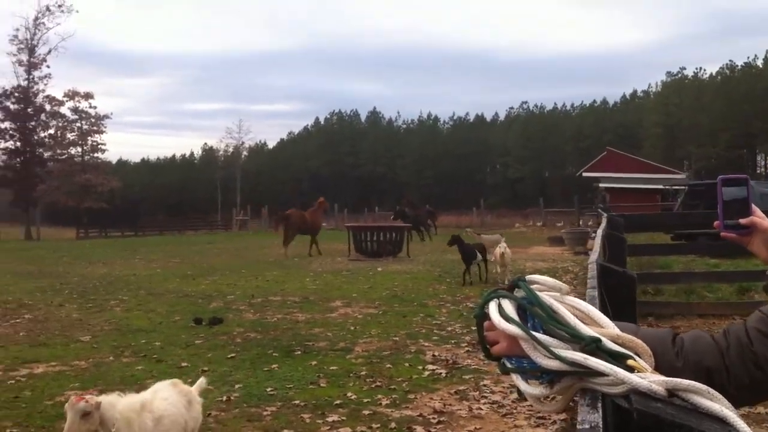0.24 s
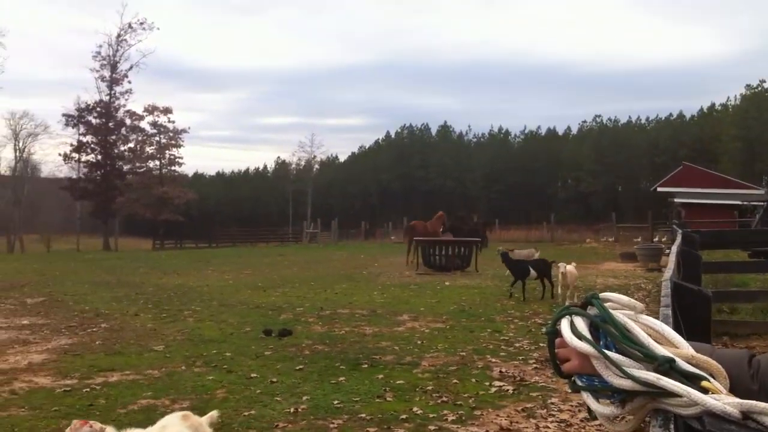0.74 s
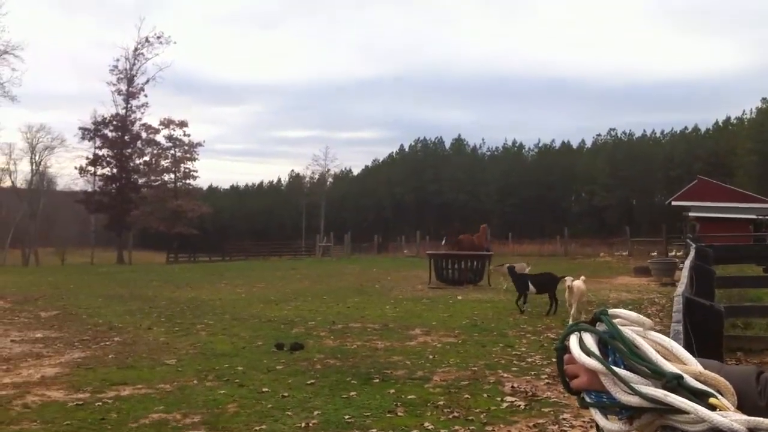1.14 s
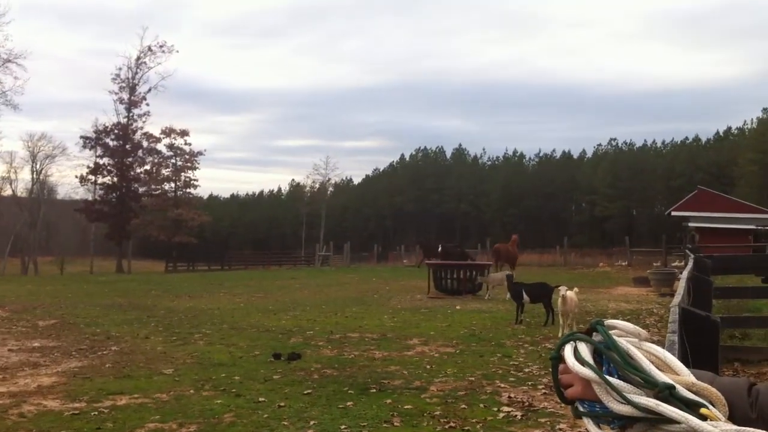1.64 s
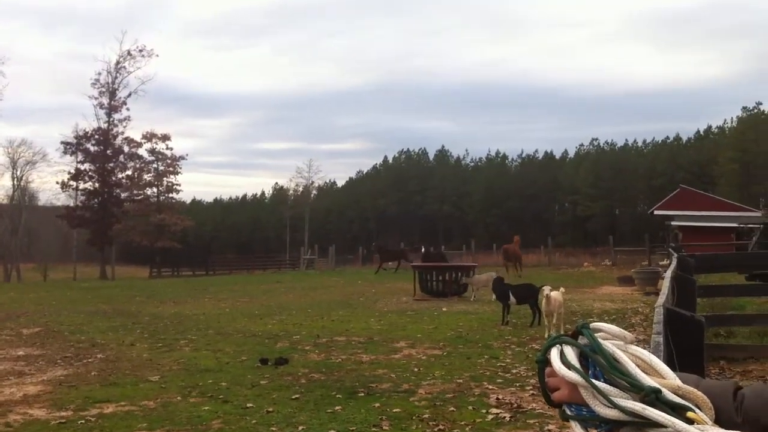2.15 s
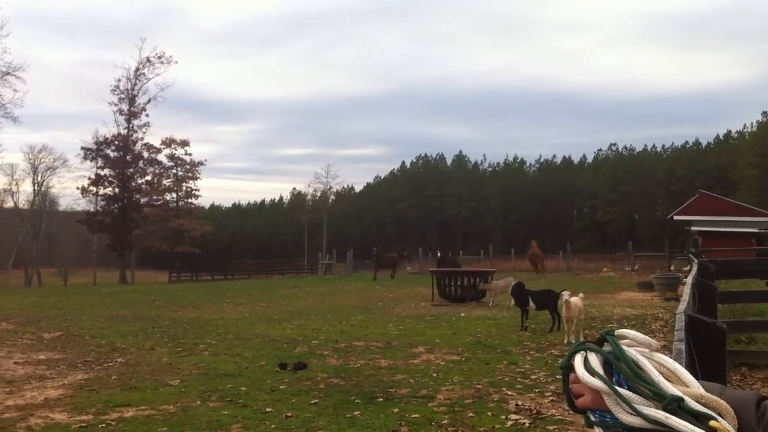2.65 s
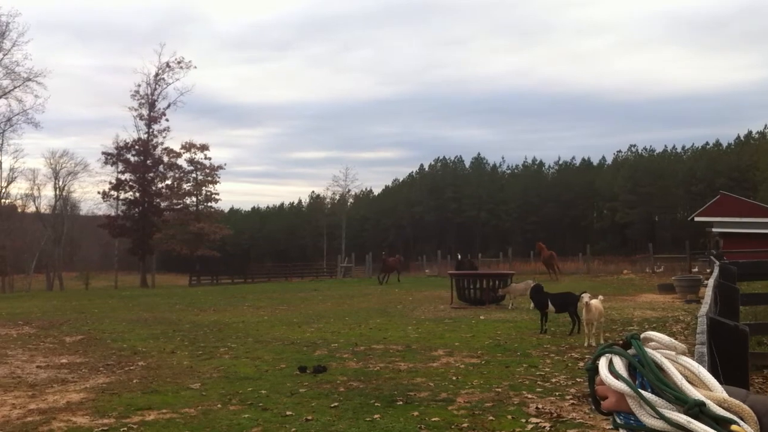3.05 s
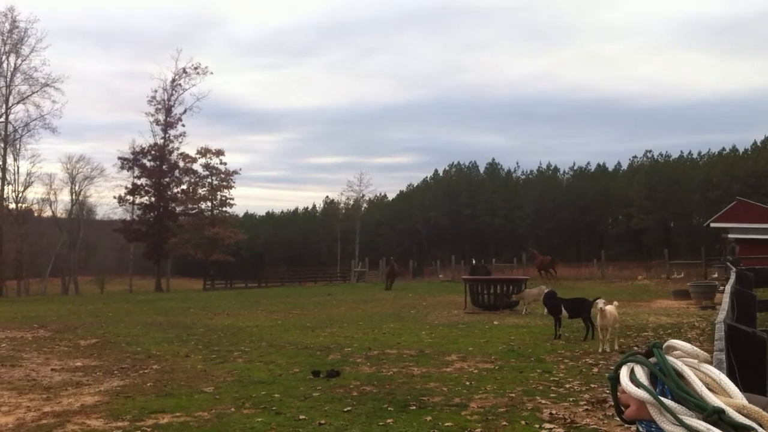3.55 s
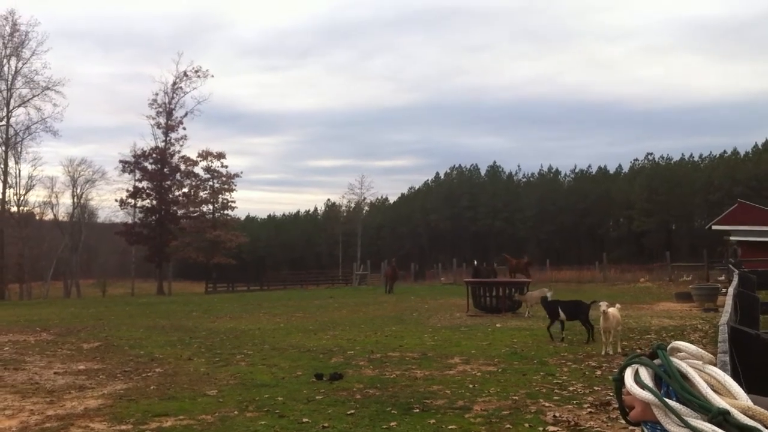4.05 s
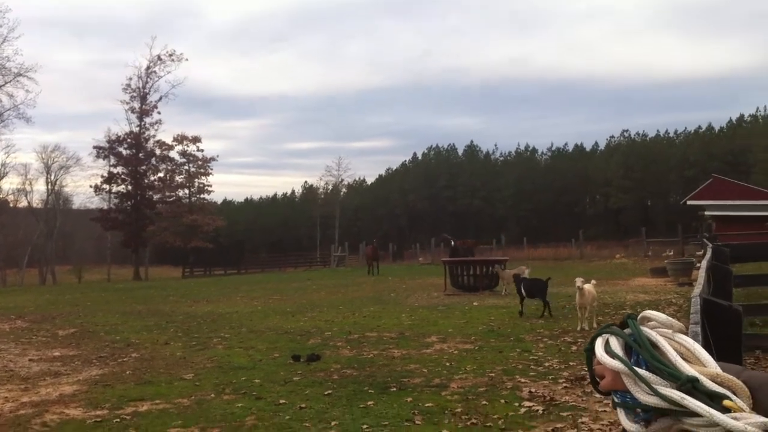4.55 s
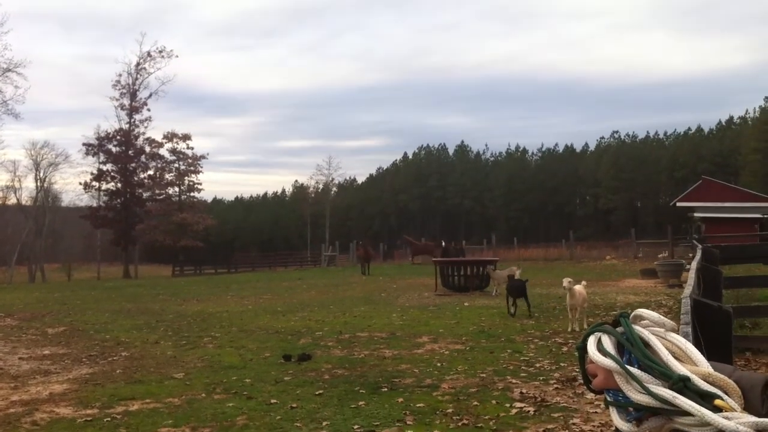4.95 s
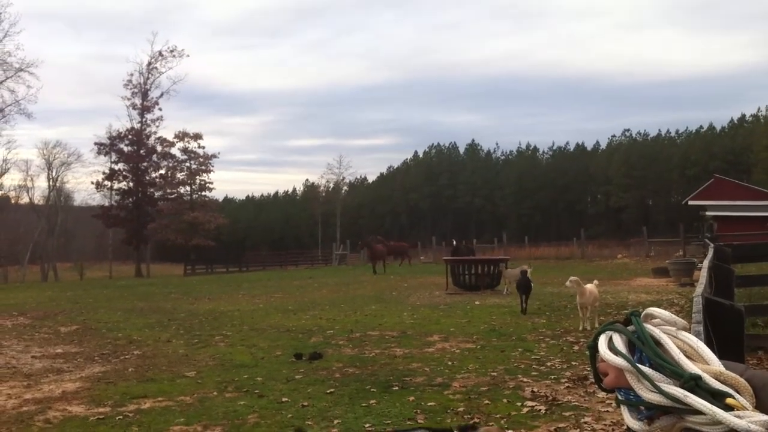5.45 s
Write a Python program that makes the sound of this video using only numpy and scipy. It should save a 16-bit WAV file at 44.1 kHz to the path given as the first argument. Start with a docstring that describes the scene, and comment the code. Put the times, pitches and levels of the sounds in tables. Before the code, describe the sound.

Handheld phone-like microphone in a still field by trees. Low, soft hoof thuds come unevenly, mixed with bright small snaps and short leaf shuffles. A sudden wooden knock stands out, echoing faintly off the woods. Soon stiff fabric scrapes and crackles very close, in two bursts. It quiets down to sparse leaf sounds before a low, breathy, fluttering horse snort and one last deep thud.

```python
"""A quiet autumn pasture: still air, far hooves and faint leaf stir (coloured noise and random grains).
From the start, stalks snap (resonant ticks), near hooves thud (sagging tones) and feet shuffle in leaves.
From 2.5 s one hard and two far softer blows ring a board (decaying modes), with a tree echo (noise wash);
from 3.2 s a coat sleeve rustles twice at the microphone (dense grains).
From 4.9 s a horse snorts: fluttering nostrils release puffs (pulses in nose resonances) and air hiss."""
import sys
import numpy as np
from scipy import signal
from scipy.fft import rfft, irfft, next_fast_len
from scipy.io import wavfile
from scipy.ndimage import uniform_filter1d

SR = 44100
rng = np.random.default_rng(int(sys.argv[2]) if len(sys.argv) > 2 else 0)


def transcribe(signal):
    """Save signal, clipped to [-1, 1], as a 16-bit WAV file at the path in sys.argv[1]."""
    frames = np.atleast_2d(signal).T
    limited = np.clip(frames, -1, 1)
    pcm = np.round(limited * 32767).astype(np.int16)
    wavfile.write(sys.argv[1], SR, pcm)


N = 251370
T = np.arange(N) / SR

# spectrum of thin dry edges: [f/Hz, density/(dB per Hz)]
CRISP_SPECTRUM = [(1500, -9), (2800, 3.5), (4000, 2), (6500, 4), (9000, 2), (12000, 1), (16000, -1.5)]
# spectrum of crushed lower leaf layers: [f/Hz, density/(dB per Hz)]
CRUNCH_SPECTRUM = [(250, -21), (600, 6.5), (1000, -1), (1700, 7), (2800, 1.5), (4000, 5.5), (7000, -53.5)]


def undb(db):
    """Decibels to gain."""
    return 10 ** (np.asarray(db) / 20)


def unit(x):
    """Scale to rms 1."""
    return x / np.sqrt(np.mean(x ** 2) + 1e-30)


def decay(t, t60_s):
    """Exponential fade, -60 dB at t60_s."""
    return np.exp(-np.log(1000) * t / t60_s)


def read(points, hz):
    """Interpolate (f/Hz, value) points on a log-frequency axis."""
    f, value = np.transpose(points)
    return np.interp(np.log(hz), np.log(f), value)


def curves(rows):
    """Interpolate each column of a time table at every sample."""
    s, *columns = np.transpose(rows)
    return [np.interp(T, s, c) for c in columns]


def add(out, s, x):
    """Mix x into out from time s."""
    i = max(int(s * SR), 0)
    out[i:i + len(x)] += x[:max(N - i, 0)]


def band(x, hz, width_hz):
    """One resonance, gain 1 at its centre."""
    hz = min(hz, 0.45 * SR)
    b, a = signal.iirpeak(hz, hz / min(width_hz, 0.3 * SR), fs=SR)
    return signal.lfilter(b, a, x)


def colour(x, points):
    """Minimum-phase filter with the given spectrum, falling 10 dB/octave from its end values."""
    size = next_fast_len(2 * len(x), True) // 2 * 2
    hz = np.maximum(np.arange(size // 2 + 1) * SR / size, 1)
    below, above = np.maximum(points[0][0] / hz, 1), np.maximum(hz / points[-1][0], 1)
    octaves_outside = np.log2(below * above)
    cepstrum = irfft(np.log(undb(read(points, hz) - 10 * octaves_outside)))
    # fold the cepstrum to make it causal
    cepstrum[1:size // 2] *= 2
    cepstrum[size // 2 + 1:] = 0
    return irfft(rfft(x, size) * np.exp(rfft(cepstrum)), size)[:len(x)]


def crumpled(points, spread_db, count=30):
    """A spectrum with chance peaks and hollows: no two leaves ring alike."""
    hz = np.geomspace(points[0][0], points[-1][0], count)
    return np.transpose([hz, read(points, hz) + spread_db * rng.standard_normal(count)])


def crackle(rate_hz, spread_db, grain_s):
    """Random tiny noise bursts of uneven size; amplitude falls by 1/e in grain_s."""
    chance, size, noise = rng.random(N), rng.exponential(size=N), rng.standard_normal(N)
    energy = (chance < rate_hz / SR) * undb(spread_db * np.minimum(size, 4)) ** 2
    energy = signal.lfilter([1], [1, -np.exp(-2 / (grain_s * SR))], energy + 1e-12)
    return noise * np.sqrt(energy)


def burst(x, window_s):
    """Scale a hit so that its loudest window has rms 1."""
    power = uniform_filter1d(x ** 2, max(int(window_s * SR), 1))
    return x / np.sqrt(power.max())


def pasture(air_db=-65, crunch_db=-9, ticks_db=-4):
    """Still open air, drumming of far hooves and a faint stir of leaves with small stalks ticking."""
    # herd activity: [t/s, distant drumming/dB, leaf stir/dB before its crunch and ticks]
    herd = [(0, -60, -63), (.65, -67.5, -56), (1.35, -64.5, -62.5), (2.1, -71, -71), (2.8, -67, -65),
            (3.55, -66.5, -61.5), (4.7, -68, -67.5), (5.15, -62, -62), (5.5, -67, -77)]
    # spectrum of far hooves: [f/Hz, density/(dB per Hz)]
    far_hooves = [(50, -32), (110, -1.5), (180, 3.5), (270, -5.5), (420, -18.5), (900, -8.5)]
    # spectrum of open air: [f/Hz, density/(dB per Hz)]
    field = [(15, -43), (25, -13.5), (270, -0.5), (887, -14), (1040, -15), (1890, -11.5), (2220, -10),
             (2760, -20), (2990, -13), (3340, -16), (5280, -18.5), (10400, -22.5), (16000, -15.5)]
    drum_db, stir_db = curves(herd)
    footfalls = crackle(rate_hz=70, spread_db=1.5, grain_s=0.012)
    drumming = unit(colour(footfalls, far_hooves))
    brushes = crackle(rate_hz=110, spread_db=5.5, grain_s=0.014)
    ticks = crackle(rate_hz=24, spread_db=1.5, grain_s=0.0016)
    stir = unit(colour(brushes, CRISP_SPECTRUM))
    stir += undb(crunch_db) * unit(colour(brushes, CRUNCH_SPECTRUM))
    stir += undb(ticks_db) * unit(colour(ticks, CRISP_SPECTRUM))
    air = unit(colour(rng.standard_normal(N), field))
    return undb(air_db) * air + undb(drum_db) * drumming + undb(stir_db) * stir


def snaps(t60_s=0.011, tail_db=-23, tail_t60_s=0.094, breadth=1.14, variety_db=3.0):
    """A dry stalk or a stiff fold gives way with a bright tick: a noise burst through one wide resonance."""
    # snapping leaves and stalks: [t/s, level/dB, centre f/Hz]
    breaks = [(0.043, -51.5, 1620), (.089, -40, 6640), (0.464, -42, 8000), (0.508, -40.5, 6000),
              (0.541, -49, 6000), (0.593, -44.5, 7050), (.708, -51, 6450), (0.882, -51.5, 2960),
              (1.169, -46, 5000), (1.245, -49, 6000), (1.321, -46.5, 5000), (1.344, -43.5, 7000),
              (1.443, -38, 4000), (1.719, -36, 5070), (2.317, -40, 8800), (2.354, -41, 5570),
              (2.966, -38, 6540), (3.111, -43.5, 8100), (3.159, -46, 2500), (3.233, -32, 2880),
              (3.337, -30, 5070), (3.405, -39, 5500), (3.443, -37, 7960), (3.626, -47, 1600),
              (3.689, -46, 8050), (3.749, -41, 7040), (3.908, -40.5, 5150), (3.990, -47, 5000),
              (4.033, -40, 4250), (4.111, -35.5, 5000), (4.397, -30, 5640), (4.610, -41, 7040)]
    out, t = np.zeros(N), T[:SR // 10]
    fade = decay(t, t60_s) + undb(tail_db) * decay(t, tail_t60_s)
    for s, db, hz in breaks:
        tick = colour(rng.standard_normal(len(t)) * fade, crumpled([(700, 0), (16000, 0)], variety_db))
        add(out, s, undb(db) * burst(band(tick, hz, breadth * hz), 0.0029))
    return out


def hooves(rise_s=0.0031, sag=0.14, earth_db=-12, earth_t60_s=0.12, slap_db=-7, slap_t60_s=0.012):
    """Each hoof slaps and presses the turf: low cycles sag in pitch, then loose earth settles."""
    # near hooves: [t/s, thud level/dB, mid-sag thud f/Hz]
    footfalls = [(0.135, -59.5, 240), (0.319, -53, 268), (0.405, -50, 290), (.425, -53, 230),
                 (.77, -51, 282), (0.868, -48, 246), (1.058, -55.5, 223), (1.247, -48, 226),
                 (1.346, -48.5, 241), (1.434, -53, 217), (1.706, -56, 240), (1.81, -47.5, 240),
                 (2.185, -59.5, 227), (2.289, -53.5, 222), (2.349, -57, 188), (2.9, -50, 145),
                 (3.151, -49.5, 216), (3.384, -53, 149), (3.632, -57, 280), (4.99, -52.5, 195),
                 (5.675, -44, 143)]
    # spectrum of loose earth: [f/Hz, density/(dB per Hz)]
    earth_spectrum = [(70, -24), (150, 1), (260, 14), (450, -2), (800, 3), (1600, -42), (3000, -27)]
    t60_cycles = 14.4  # deep thuds last longer
    out, t = np.zeros(N), T[:SR // 4]
    press = 1 - np.exp(-(t / rise_s) ** 2)
    for s, db, hz in footfalls:
        # from (1 + sag) down to (1 - sag) times hz
        thud_hz = hz * (1 + sag * (2 * np.exp(-t / 0.0087) - 1))
        phase = np.cumsum(thud_hz) / SR
        thud = np.sin(2 * np.pi * phase) * press * decay(t, t60_cycles / hz)
        slap = rng.standard_normal(len(t)) * decay(t, slap_t60_s)
        slap = band(band(slap, 2.1 * hz, 1.4 * hz), 2 * hz, 1.6 * hz)
        earth = colour(rng.standard_normal(len(t)), earth_spectrum) * press * decay(t, earth_t60_s)
        hit = burst(thud, 0.0066)
        hit += undb(slap_db) * burst(slap, 0.011) + undb(earth_db) * burst(earth, 0.0057)
        add(out, s, undb(db) * hit)
    return out


def leaves(skew=0.52, roundness=1.0, variety_db=3.0):
    """A foot pushes into dry leaves: thin edges crackle, crushed layers crunch lower down."""
    # steps: [t/s, length/s, edge level/dB, crunch re edges/dB]; levels ahead of the push envelope
    steps = [(0.148, 0.045, -62, -3), (0.284, 0.049, -49, -19), (0.497, 0.083, -55.5, -0.5),
             (0.882, 0.025, -50, 4), (0.977, 0.085, -56.5, -4), (1.013, 0.065, -47, -3),
             (1.164, 0.065, -49, -5), (1.242, .044, -51, 1), (1.286, 0.077, -54.5, -8),
             (1.407, 0.038, -54.5, -0.5), (1.497, 0.077, -51, -18), (1.718, 0.074, -50, -26),
             (1.76, 0.062, -46.5, -8), (2.039, 0.022, -50, -8.5), (2.108, 0.052, -51, -5),
             (2.191, .056, -57.5, -24), (2.349, 0.04, -58, 1.5), (2.452, 0.016, -53, -3.5),
             (2.597, 0.1, -50, -6), (2.759, 0.064, -49.5, -8), (2.823, 0.051, -59, -13),
             (3.032, 0.035, -53.5, -6), (3.157, 0.028, -45.5, -5), (3.422, 0.027, -43, -6.5),
             (3.459, 0.041, -43, -11), (3.622, 0.043, -60, 13.5), (3.736, 0.039, -58, -4),
             (4.584, 0.05, -56, -9), (4.681, 0.037, -52, -8.5), (4.872, 0.067, -52.5, -12),
             (5.192, 0.032, -43, -33), (5.293, 0.18, -61.5, -3), (5.591, 0.12, -52.5, -8)]
    out = np.zeros(N)
    edges = crackle(rate_hz=1000, spread_db=3.5, grain_s=0.002)
    layers = crackle(rate_hz=1100, spread_db=5, grain_s=0.001)
    for s, length_s, step_db, crunch_db in steps:
        size = int(length_s * SR)
        push = np.abs(np.sin(np.pi * np.linspace(0, 1, size) ** skew)) ** roundness
        parts = ((edges, CRISP_SPECTRUM, step_db), (layers, CRUNCH_SPECTRUM, step_db + crunch_db))
        for grains, spectrum, db in parts:
            handful = grains[rng.integers(N - SR):][:size]
            add(out, s, undb(db) * push * unit(colour(handful, crumpled(spectrum, variety_db))))
    return out


def board(crack_db=-1, travel_s=0.0071, dispersion=0.5, panel_hz=368, panel_rise_s=0.014,
          echo_db=-23, echo_t60_s=1.0, echo_rise_s=0.015):
    """A blow rings the board and sets a loose panel humming; the trees send back a soft wash."""
    # blows: [t/s, board level/dB, contact low-pass f/Hz, panel re board/dB, panel t60/s]
    knocks = [(2.4875, -29.5, 3000, -28, 0.28), (2.8636, -54.5, 614, 5.5, 0.12),
              (3.366, -61.5, 590, 10, 0.058)]
    # board modes: [f/Hz, relative level/dB, t60/s]
    modes = [(195, -7, 0.28), (232, -10, 0.26), (259, 3.5, 0.11), (314.4, -6.5, 0.27), (373, -2.5, 0.3),
             (440, -1.5, 0.11), (507, -7, 0.18), (694, -1.5, 0.1), (794, -11, 0.19), (860, -9, 0.18),
             (1003, -16, 0.37), (1126, -10.5, 0.29), (1236, 6, 0.043), (1287, 10, 0.028), (1500, -14, 0.25),
             (1677, -4, 0.056), (1910, -3, 0.07), (2150, -4, 0.048), (2540, -7, 0.047)]
    # spectrum of the first crack: [f/Hz, density/(dB per Hz)]
    crack_spectrum = [(80, -30), (160, 7), (270, 3), (450, 8.5), (750, 8), (1300, 0.5), (2200, -2),
                      (3500, -6), (6000, -2), (12000, -7)]
    # decay of the crack: [f/Hz, t60/s]
    crack_t60 = [(150, 0.33), (600, 0.14), (1500, 0.063), (3000, 0.055), (8000, 0.026)]
    # spectrum of the tree echo: [f/Hz, density/(dB per Hz)]
    trees = [(100, -36), (220, 7), (500, -2), (1000, 0.5), (2000, 1), (3000, -7), (5000, -36)]
    out, t = np.zeros(N), T[:SR]

    def swell(hz, t60_s):
        """Low bending waves travel slowly, so they build up last, then die away."""
        build_s = travel_s * (300 / hz) ** dispersion
        return (1 - np.exp(-(t / build_s) ** 2)) * decay(t, t60_s)

    for s, db, contact_hz, panel_db, panel_t60_s in knocks:
        ring = np.zeros(len(t))
        for hz, mode_db, t60_s in modes:
            ring += undb(mode_db) * np.sin(2 * np.pi * (hz * t + rng.random())) * swell(hz, t60_s)
        crack = np.zeros(len(t))
        for hz in np.geomspace(180, 12000, 13):
            noise = unit(band(band(rng.standard_normal(len(t)), hz, hz / 2), hz, hz / 2))
            # sqrt(hz): density to band level
            crack += undb(read(crack_spectrum, hz)) * np.sqrt(hz) * noise * swell(hz, read(crack_t60, hz))
        echo = unit(colour(rng.standard_normal(len(t)), trees))
        echo *= (1 - np.exp(-t / echo_rise_s)) * decay(t, echo_t60_s)
        blow = burst(ring, 0.0049) + undb(crack_db) * burst(crack, 0.025) + undb(echo_db) * echo
        # a softer contact leaves the high modes still
        contact = signal.butter(2, min(contact_hz, SR / 4), fs=SR, output="sos")
        blow = signal.sosfilt(contact, blow)
        panel = np.sin(2 * np.pi * panel_hz * t)
        panel *= (1 - np.exp(-(t / panel_rise_s) ** 2)) * decay(t, panel_t60_s)
        add(out, s, undb(db) * (burst(blow, 0.09) + undb(panel_db) * burst(panel, 0.03)))
    return out


def sleeve(catch_db=0.94, catch_s=0.011, variety_db=2, ticks_db=-7, fold_skew=0.57):
    """Threads catch and slip in dense grains, stiff creases tick; the folds rumble as they shift."""
    # strokes: [t/s, length/s, final hiss level/dB, swell over the stroke/dB, weave rasp re hiss/dB]
    strokes = [(3.226, 0.11, -39, -1.5, -2), (3.78, 0.093, -46.5, 2, -6), (3.901, 0.073, -56.5, 7, 0),
               (4.023, 0.031, -45.5, 8, 0.5), (4.085, 0.14, -49, 4, 0), (4.193, 0.086, -43.5, 3.5, -3),
               (4.285, 0.11, -40.5, -1.5, -1.5)]
    # heavy coat folds: [t/s, length/s, peak level/dB]
    fold_shifts = [(3.275, 0.21, -60.5), (3.826, 0.24, -62.5), (4.046, 0.42, -46.5)]
    # spectra of threads, weave and folds: [f/Hz, density/(dB per Hz)]
    hiss_spectrum = [(2200, -4.5), (3600, 3), (5500, 0.5), (9000, -2), (12000, -3.5), (16000, -7.5)]
    rasp_spectrum = [(300, -14), (700, -9.5), (1100, -2), (1600, -3.5), (2200, 1.5), (3200, -8.5),
                     (4500, -19), (8000, -20)]
    fold_spectrum = [(50, -32), (110, -18.5), (180, 3.5), (280, 1.5), (500, -6), (900, -13.5), (2000, -54)]
    attack_s, stop_s = 0.014, 0.021
    settle_db, settle_s = -14, 0.12  # the cloth creeps on after each stroke
    threads = crackle(rate_hz=3300, spread_db=0.5, grain_s=0.0016)
    weave = crackle(rate_hz=2000, spread_db=2.0, grain_s=0.0019)
    creases = unit(colour(crackle(rate_hz=70, spread_db=2, grain_s=0.0012), CRISP_SPECTRUM))
    folds = unit(colour(crackle(rate_hz=1100, spread_db=2.5, grain_s=0.0033), fold_spectrum))
    # the cloth moves in small jerks
    jerks = undb(catch_db * unit(uniform_filter1d(rng.standard_normal(N), int(catch_s * SR))))
    out = np.zeros(N)
    for s, length_s, db, swell_db, rasp_db in strokes:
        done = np.clip((T - s) / length_s, 0, 1)
        after_s = np.maximum(T - s - length_s, 0)
        release = np.maximum(np.exp(-after_s / stop_s), undb(settle_db) * np.exp(-after_s / settle_s))
        slide = np.clip((T - s) / attack_s, 0, 1) * undb(db + swell_db * (done - 1)) * release
        hiss = unit(colour(threads, crumpled(hiss_spectrum, variety_db)))
        rasp = unit(colour(weave, crumpled(rasp_spectrum, variety_db)))
        out += slide * (jerks * (hiss + undb(rasp_db) * rasp) + undb(ticks_db) * creases)
    for s, length_s, db in fold_shifts:
        shift = np.sin(np.pi * np.clip((T - s) / length_s, 0, 1) ** fold_skew) ** 2
        out += undb(db) * shift * folds
    return out


def snort(jitter=0.075, scatter_db=0.5, leak=0.87, closed_hz=44):
    """Nostrils flap open, faster in a push of air: each puff rings the nose and lets air hiss out."""
    # nose resonances: [f/Hz, width of the first of two filters/Hz, relative level/dB]
    nose = [(231, 70, 9.5), (513, 167, 8.5)]
    # spectrum of escaping air: [f/Hz, density/(dB per Hz)]
    nose_air = [(700, -21), (1300, 2), (1800, -4), (2250, 5), (3000, 1), (4500, -10), (9000, -30)]
    start_s, attack_s, push_peak_s, push_width_s = 4.94, 0.08, 5.1, 0.11
    flutter_hz, puff_db, blow_db = 43.17, -60.5, -68.5  # steady part, levels ahead of scaling by std
    push_hz, push_puff_db, push_blow_db = 18, 1.5, 4  # added at the height of the push
    open_s, turbulence = 0.0045, 0.09
    push = np.exp(-((T - push_peak_s) / push_width_s) ** 2)
    rate_hz = flutter_hz + push_hz * push
    flaps, s = np.zeros(N), start_s
    for timing, size in rng.standard_normal((64, 2)):
        if s < T[-1]:
            i = int(s * SR)
            flaps[i] = undb(scatter_db * size)
            s += np.exp(jitter * timing) / rate_hz[i]
    blowing = T >= start_s
    # in fast flutter the nostrils no longer close between puffs
    gap = leak * blowing * np.maximum(rate_hz / closed_hz - 1, 0)
    opening = signal.lfilter([1], [1, -np.exp(-1 / (open_s * SR))], flaps) + gap
    flow = flaps + turbulence * opening * rng.standard_normal(N)
    puffs = sum(undb(db) * band(band(flow, hz, width), hz, 2 * width) for hz, width, db in nose)
    air = colour(rng.standard_normal(N) * opening, nose_air)
    attack = np.clip((T - start_s) / attack_s, 0, 1)
    puffs = undb(puff_db + push_puff_db * push) * puffs / puffs[blowing].std()
    air = undb(blow_db + push_blow_db * push) * air / air[blowing].std()
    return attack * (puffs + air)


def scene():
    """Everything reaches one microphone."""
    return (pasture() + snaps() + hooves() + leaves() + board() + sleeve() + snort())[None]


def record(dry):
    """The phone cuts the top: steep elliptic low-pass."""
    top_hz = 15900
    low_pass = signal.ellip(10, 0.2, 70, top_hz, fs=SR, output="sos")
    return signal.sosfilt(low_pass, dry)


dry = scene()
out = record(dry)
transcribe(out)
```